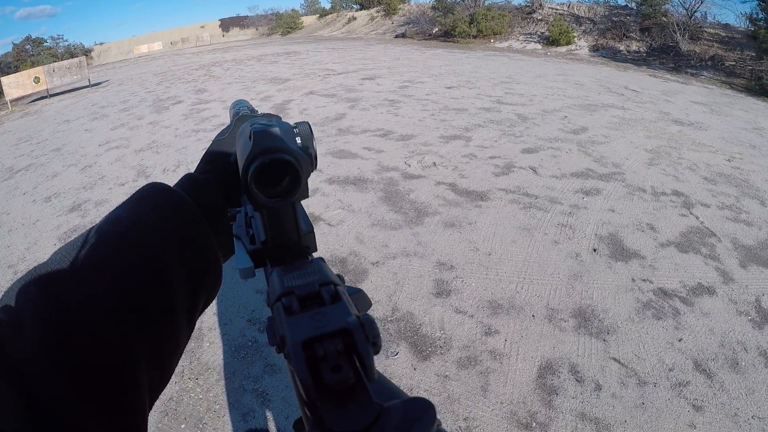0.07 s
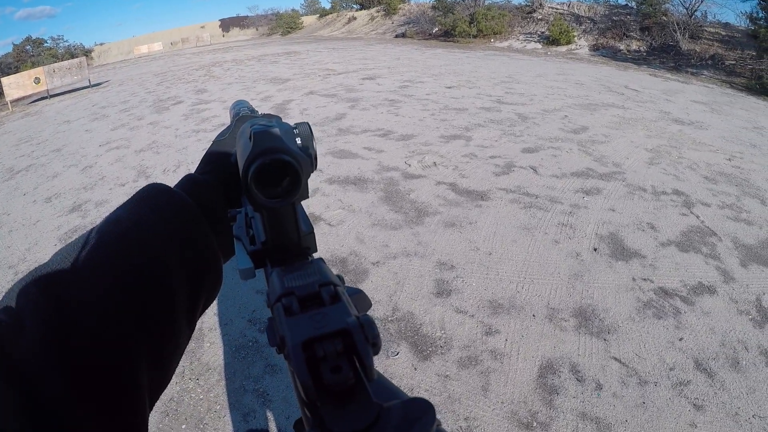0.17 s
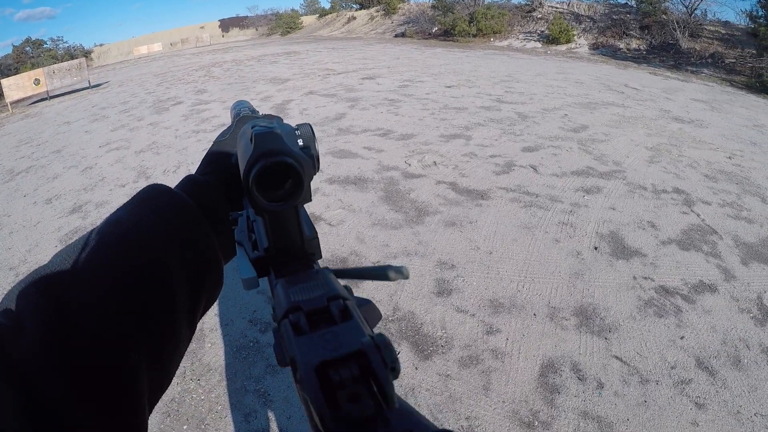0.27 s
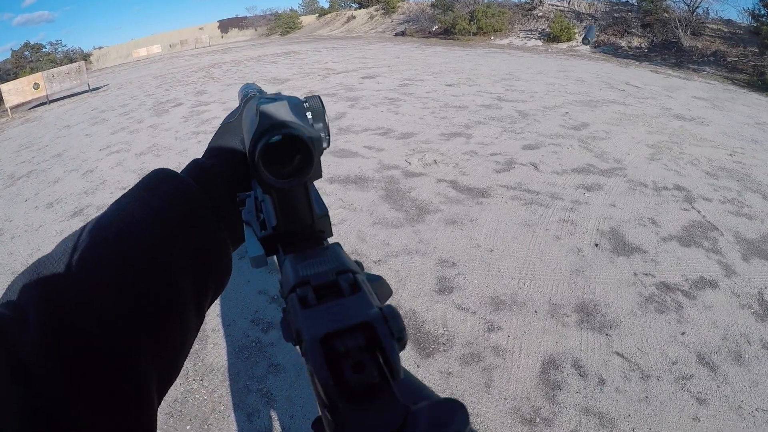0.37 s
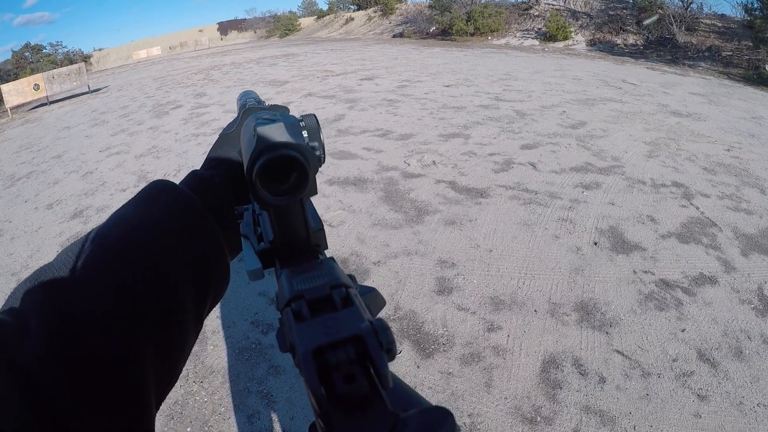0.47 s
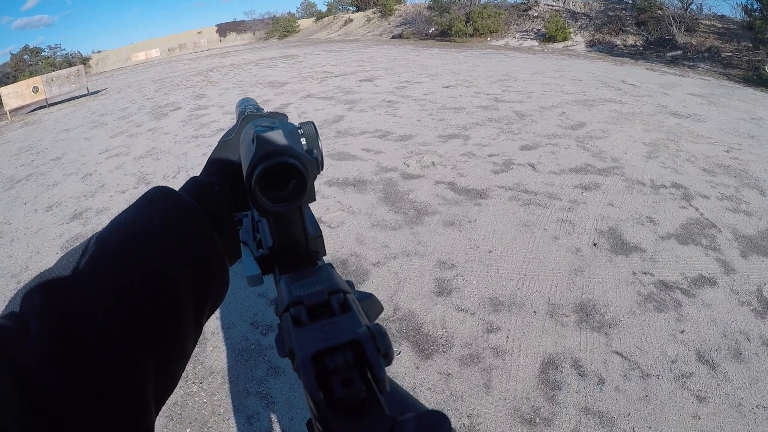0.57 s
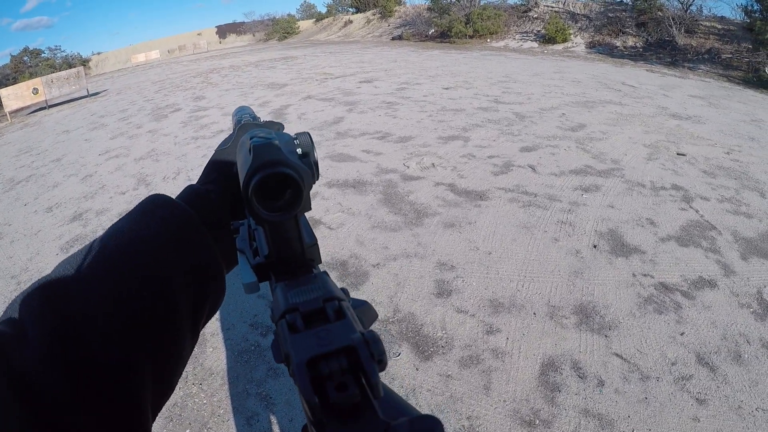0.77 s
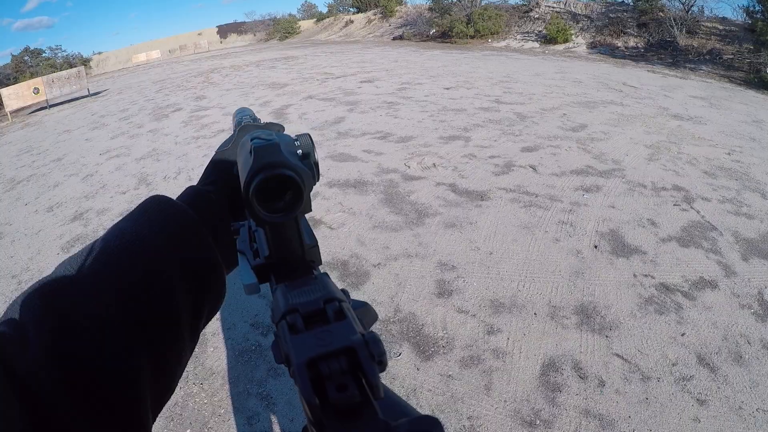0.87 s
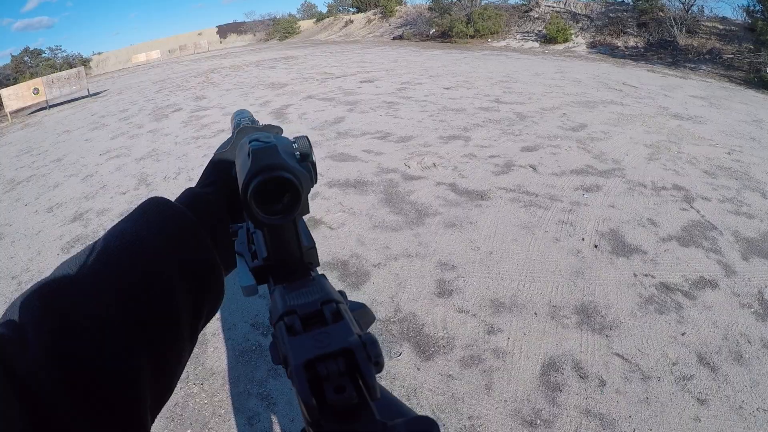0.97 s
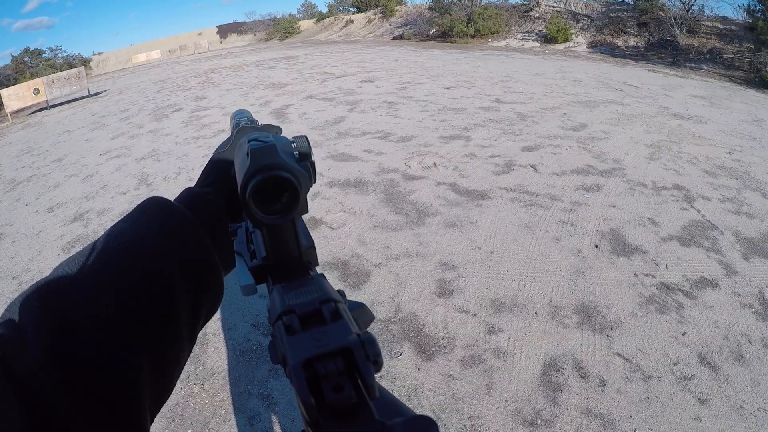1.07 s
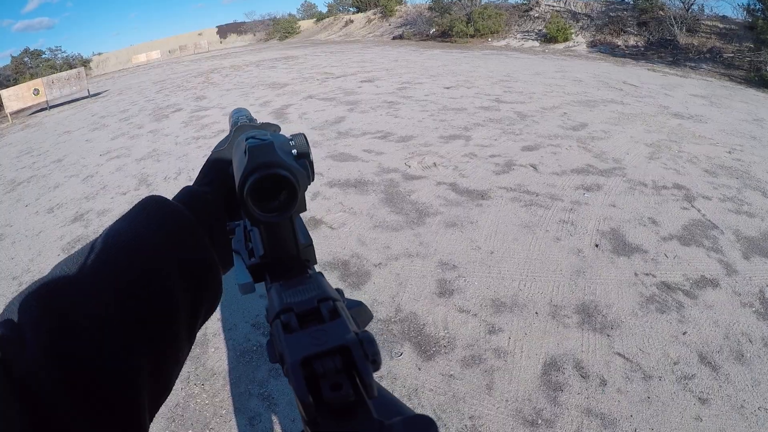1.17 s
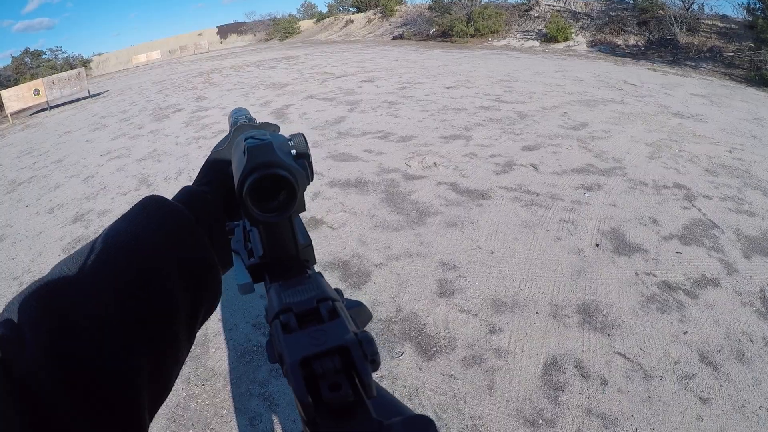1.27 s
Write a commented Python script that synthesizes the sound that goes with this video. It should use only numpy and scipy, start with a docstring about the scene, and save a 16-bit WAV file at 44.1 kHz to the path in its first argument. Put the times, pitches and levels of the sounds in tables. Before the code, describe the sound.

A suppressed rifle shot outdoors, then a bullet smacks steel and rings high and brief

```python
"""Suppressed rifle shot and ringing metal

Outdoors in wind, heard from just behind the gun: wind is noise under moving level curves, and the report
is a quick run of gas puffs over a low thump, ending in a sharp noise blast. The action clacks and the
berms answer as diffuse noise. A third of a second later come a crack and a smack, then a high metallic
ring, a sum of decaying modes with a smeared return. The next shot is just starting at the end.
"""
import sys
import numpy as np
from scipy import signal
from scipy.fft import rfft, irfft, next_fast_len
from scipy.io import wavfile
from scipy.ndimage import map_coordinates

SR = 44100
rng = np.random.default_rng(int(sys.argv[2]) if len(sys.argv) > 2 else 0)


def to_wav(sig):
    """Store sig (one row per channel, or 1-D mono) as 16-bit WAV at the path in sys.argv[1].

    Samples outside -1..1 are clipped; the rate is SR.
    """
    pcm = np.clip(np.atleast_2d(sig), -1, 1) * 32767
    pcm = np.round(pcm).astype(np.int16)
    wavfile.write(sys.argv[1], SR, pcm.T)  # frames by channels


N = 57330
T = np.arange(N) / SR  # time in s
NEAR_ALIKE, FAR_ALIKE, WIND_ALIKE = 0.74, 0.16, 0.13  # left-right correlation of the noise


def amp(db):
    """Level to amplitude ratio: 20 dB is a factor of ten."""
    return 10 ** (np.asarray(db) / 20)


def unit(x):
    """Normalisation by root mean square, so that a gain sets the level."""
    return x / np.sqrt(np.mean(x ** 2) + 1e-20)


def along(points, hz):
    """Interpolation of a spectrum on a logarithmic frequency axis."""
    f, v = np.transpose(points)
    return np.interp(np.log(hz + 1), np.log(f + 1), v)


def level(rows):
    """Amplitude modulation whose level in dB runs in straight lines between (time_s, level_db) rows."""
    return amp(np.interp(T, *np.transpose(rows)))


def pan(db):
    """Interaural level difference: half the dB raise the left channel, half lower the right."""
    return amp(np.array([[db], [-db]]) / 2)


def filtered(x, response):
    """Linear filtering: the spectrum of x is multiplied by a frequency response."""
    size = next_fast_len(N + 8192)  # zero padding limits wrap-around
    hz = np.fft.rfftfreq(size, 1 / SR)
    return irfft(rfft(x, size) * response(hz), size)[..., :N]


def noise(colour, alike, pan_db):
    """Partially correlated stereo noise: a shared part plus a part of opposite sign in the two channels."""
    white = rng.standard_normal((2, N))
    shared, opposed = filtered(white, lambda hz: amp(along(colour, hz)))
    angle = np.arccos(np.clip(alike, -1, 1)) / 2
    stereo = np.cos(angle) * shared + np.sin(angle) * np.array([opposed, -opposed])
    return unit(stereo) * pan(pan_db)


def strike(s, rise, t60):
    """Exponential growth up to time s (time constant rise), then exponential decay of 60 dB in t60."""
    swell = np.exp(np.minimum(T - s, 0) / rise)
    decay = amp(-60 * np.maximum(T - s, 0) / t60)
    return swell * decay


def packet(s, hz, db, width):
    """Gaussian wave packet: a brief pressure oscillation, negative at its centre."""
    return -amp(db) * np.exp(-((T - s) / width) ** 2) * np.cos(2 * np.pi * hz * (T - s))


def wind():
    """Turbulent pressure noise: rumble on the microphone, a midrange rush and a thin hiss."""
    # level of the rumble: time_s, level_db
    rumble_level = [(0, -34), (.1, -38.5), (.21, -34), (.32, -45.5), (.48, -49), (.54, -44.5), (.66, -42.5),
                    (.8, -44.5), (.98, -49), (1.08, -53.5), (1.15, -44), (1.29, -43)]
    # spectrum of the rumble: frequency_hz, level_db
    rumble_colour = [(15, -2), (35, -0.5), (70, 1), (120, -9.5), (200, -16.5), (400, -28.5), (1000, -37.5),
                     (3000, -77)]
    # level of the midrange rush: time_s, level_db
    rush_level = [(0, -49.5), (.22, -47), (.3, -61.5), (.9, -59), (1.1, -59.5), (1.29, -55)]
    # spectrum of the rush: frequency_hz, level_db
    rush_colour = [(100, 8), (300, 2), (800, -1.5), (1600, -7), (3000, -26), (8000, -28), (15000, -52)]
    # level of the hiss: time_s, level_db
    hiss_level = [(0, -65.5), (.22, -63.5), (.5, -67), (1, -76), (1.29, -75.5)]
    # spectrum of the hiss: frequency_hz, level_db
    hiss_colour = [(1000, -5), (3500, -14), (5200, -15), (7200, -3.5), (10000, 0), (13000, -14),
                   (15500, -20.5)]
    rumble = level(rumble_level) * noise(rumble_colour, WIND_ALIKE, pan_db=3.5)
    rush = level(rush_level) * noise(rush_colour, FAR_ALIKE, pan_db=-2.5)
    hiss = level(hiss_level) * noise(hiss_colour, FAR_ALIKE, pan_db=-3.5)
    return rumble + rush + hiss


def action():
    """Impulsive excitation of the rifle's moving parts: coloured noise bursts that decay exponentially."""
    # clacks: peak_s, level_db, t60_s
    clacks = [(0.226, -38, 0.046), (0.2329, -38, 0.036), (0.286, -40, .03), (0.316, -37.5, 0.051),
              (0.3227, -22.5, 0.015), (0.332, -41.5, 0.088), (1.052, -55, 0.035), (1.289, -49.5, .05)]
    # spectrum of a clack: frequency_hz, level_db
    clack_colour = [(100, -13), (280, -5), (700, -21.5), (1800, -9.5), (4000, 1.5), (5500, -5), (7600, 3),
                    (9500, -14), (15000, -28)]
    envelope = sum(amp(db) * strike(s, 0.00094, t60) for s, db, t60 in clacks)
    return envelope * noise(clack_colour, NEAR_ALIKE, pan_db=-0.5)


def shot():
    """Gas expansion: puffs and low thumps as wave packets, the hissing blast as turbulent noise."""
    # gas puffs of the report: centre_s, pitch_hz, level_db, half_width_s (to 1/e)
    puff_rows = [(.2365, 790, -26.5, .0014), (.247, 780, -12, .0014), (.2571, 750, -5, .0015),
                 (.2671, 790, -4.5, .0016), (1.2995, 650, -30, .0008)]
    # thumps of the shot, the smack and buffeting: centre_s, pitch_hz, level_db, half_width_s, left_minus_right_db
    thump_rows = [(0.2591, 141, -12.5, 0.0081, 8.5), (0.2712, 190, -12.5, 0.0012, 8),
                  (0.2784, 156.5, -20, .004, -0.5), (.327, 273, -39.5, 0.0041, 1.5),
                  (.411, 210, -35, 0.0061, -2), (.5713, 560, -17.5, 0.0015, 1.5),
                  (0.5745, 195, -21, .0019, 2), (0.688, 205, -24.5, 0.0017, 7.5),
                  (0.7501, 170, -38, 0.0034, 15), (1.2757, 160, -25.5, 0.0023, 14.5),
                  (1.2905, 135, -26, 0.0068, 19)]
    # gas leaving the suppressor: peak_s, level_db, rise_s (time constant), t60_s
    blasts = [(0.2468, -25.5, 0.0014, 0.11), (0.2613, -20, 0.0028, 0.022), (0.2666, -7.5, 0.0007, 0.014),
              (0.2677, -10.5, .0005, 0.014), (.276, -22, 0.0022, .035), (1.2995, -43.5, .004, 0.033)]
    # spectrum of the blast: frequency_hz, level_db
    blast_colour = [(650, -31), (1100, -3), (1900, -9.5), (2400, -2.5), (2980, -2), (3330, -5), (3840, -4),
                    (5500, -11), (6120, -3), (7800, -4), (10400, -24.5), (12000, -21), (15500, -32)]
    puffs = sum(packet(*row) for row in puff_rows)
    thumps = sum(packet(s, hz, db, width) * pan(side) for s, hz, db, width, side in thump_rows)
    gas = sum(amp(db) * strike(s, rise, t60) for s, db, rise, t60 in blasts)
    return puffs + thumps + gas * noise(blast_colour, NEAR_ALIKE, pan_db=-1.5)


def berms():
    """Diffuse reflection from ground, brush and berms: echo noise, a low boom and a late fluttering slap."""
    # level of the scattered echoes: time_s, level_db
    echo_level = [(.27, -59), (.285, -45.5), (.31, -44.5), (.36, -55.5), (.395, -45.5), (.43, -43),
                  (.48, -48.5), (.54, -42.5), (.6, -42.5), (.675, -43), (.72, -48.5), (.82, -62.5),
                  (.865, -62.5), (.91, -73), (.95, -68.5), (1.02, -70), (1.29, -76)]
    # spectrum of the echoes: frequency_hz, level_db
    echo_colour = [(100, -7.5), (300, -3), (700, -7.5), (1500, -2), (3500, 1), (5200, -5.5), (7300, 4.5),
                   (9500, -15), (15000, -33)]
    # level of the low boom: time_s, level_db
    boom_level = [(.27, -76), (.37, -61.5), (.42, -42), (.52, -63), (.65, -42), (.71, -45), (.76, -39.5),
                  (.8, -47), (.87, -54), (1, -60)]
    # spectrum of the boom: frequency_hz, level_db
    boom_colour = [(40, -9.5), (90, 6), (200, 1.5), (300, -9), (450, -24), (1000, -43)]
    # spectrum of the dull slap from the far berm: frequency_hz, level_db
    slap_colour = [(300, -12), (800, 1), (1800, 2), (3000, -17), (8000, -27.5)]
    slap_s, slap_db, slap_rise_s, slap_t60 = 0.8955, -54.5, 0.033, 0.185
    flutter_db, flutter_per_s = 3, 90  # spread and rate of the random level values
    steps = rng.standard_normal(int(T[-1] * flutter_per_s) + 2)
    flutter = amp(flutter_db * map_coordinates(steps, [T * flutter_per_s]))
    slap_envelope = amp(slap_db) * flutter * strike(slap_s, slap_rise_s, slap_t60)
    slap = slap_envelope * noise(slap_colour, FAR_ALIKE, pan_db=-9.0)
    echoes = level(echo_level) * noise(echo_colour, FAR_ALIKE, pan_db=-.5)
    boom = level(boom_level) * noise(boom_colour, WIND_ALIKE, pan_db=7.5)
    return slap + echoes + boom


def crack_and_smack():
    """Impulsive broadband noise: faint dull knocks, a bright crack and a dull smack, each decaying fast."""
    # knocks: peak_s, level_db, t60_s
    knock_rows = [(0.408, -44.5, 0.055), (0.686, -29, 0.026)]
    # spectrum of the knocks: frequency_hz, level_db
    knock_colour = [(60, -7), (250, 3), (500, 0), (900, -16.5), (1300, -9.5), (3500, -19.5), (7000, -28.5),
                    (15000, -60)]
    # spectrum of the crack: frequency_hz, level_db
    crack_colour = [(290, -35.5), (500, -14), (1050, -11), (2000, 6), (3050, -9), (3940, 7.5), (5400, -5.5),
                    (6670, 9.5), (9000, -11.5), (15000, -36)]
    # spectrum of the smack: frequency_hz, level_db
    smack_colour = [(40, 1), (150, -5), (300, -6), (600, -6.5), (1000, -18), (2200, 4), (3500, -13.5),
                    (6000, -17.5), (15000, -49.5)]
    crack_s, crack_db, crack_t60 = .5594, -13.5, 0.0068  # the snap just before the smack
    smack_s, smack_db, smack_t60 = .5705, -13.5, 0.012
    crack_envelope = amp(crack_db) * strike(crack_s, 0.00033, crack_t60)
    crack = crack_envelope * noise(crack_colour, NEAR_ALIKE, pan_db=-4.5)
    smack_envelope = amp(smack_db) * strike(smack_s, 0.00037, smack_t60)
    smack = smack_envelope * noise(smack_colour, NEAR_ALIKE, pan_db=4.5)
    knocks = sum(amp(db) * strike(s, 0.00037, t60) for s, db, t60 in knock_rows)
    return crack + smack + knocks * noise(knock_colour, NEAR_ALIKE, pan_db=6.5)


def metal_ring(count=60):
    """Modal superposition: strong modes, a shimmer of count weak ones, and a splash of decaying noise."""
    # strong modes of the metal: pitch_hz, relative_level_db, t60_s
    strong_modes = [(1772, -18, .32), (2050, -17, .32), (3494, -19, .7), (4423, -24, .7), (5224, -17, .5),
                    (5350, -21, .55), (5760, -22, .35), (6155, -18, .45), (6551, -13, .35),
                    (6681, -22, .35), (6821, -11, .46), (7127, 1.5, .36), (7418, -2.5, .27),
                    (7499, -12, .25), (7650, -11, .36), (7800, -11, .32), (7924, -6.5, .33),
                    (8280, -17, .33), (8689, -22, .46), (8861, -20, .35), (9641, -19, .42),
                    (10018, -26, .52), (10311, -21, .3), (10600, -31, .6), (11300, -17, .55),
                    (12005, -23, .38), (12473, -23, .4), (12699, -23, .45), (13420, -28, .35),
                    (13700, -28, .35)]
    # relative strength of the weak modes: frequency_hz, level_db
    shimmer_colour = [(3000, 3), (5000, -6), (6500, 3.5), (8500, 3), (10500, -23), (12500, 1.5),
                      (14500, -12.5)]
    # spectrum of the splash: frequency_hz, level_db
    splash_colour = [(150, -20), (500, -7.5), (1000, -7.5), (1900, -1.5), (3000, -8), (5000, -5),
                     (7400, -5), (9000, -34), (15000, -51.5)]
    ring_s, ring_attack_s = .5712, 0.00028  # start, and time constant of the onset
    ring_db, ring_pan_db = -24, -5
    shimmer_db, shimmer_t60 = -39.5, 0.45
    splash_db, splash_t60 = -33, 0.34
    waver_db, waver_per_s = 2.6, 32  # spread and rate of each mode's random level values
    flare_db, flare_s = 5, .011  # louder just after the onset, then settling
    t = np.maximum(T - ring_s, 0)

    def mode(hz, t60, scatter):
        """Damped oscillation of unsteady level; scatter (radians) puts the two channels out of step."""
        phase = rng.uniform(0, 2 * np.pi) + scatter * rng.standard_normal((2, 1))
        waver = map_coordinates(rng.standard_normal(count), [t * waver_per_s])
        return np.sin(2 * np.pi * hz * t + phase) * amp(waver_db * waver - 60 * t / t60)

    flare = amp(flare_db * np.exp(-t / flare_s))
    modes = sum(amp(ring_db + db) * mode(hz, t60, scatter=0.29) for hz, db, t60 in strong_modes)
    ring = flare * modes * pan(ring_pan_db)

    # one weak mode at a random place in each equal slice of the band
    pitches = 3000 + 11500 * (np.arange(count) + rng.random(count)) / count
    sizes = amp(along(shimmer_colour, pitches) + rng.normal(0, 4.1, count))
    gains = sizes / np.linalg.norm(sizes)
    weak = sum(gain * mode(hz, shimmer_t60, scatter=1.1) for hz, gain in zip(pitches, gains))
    shimmer = amp(shimmer_db) * weak * pan(db=13.5)

    splash = amp(splash_db - 60 * t / splash_t60) * noise(splash_colour, FAR_ALIKE, pan_db=4.0)
    onset = 1 - np.exp(-t / ring_attack_s)  # zero until the ring starts
    return (ring + shimmer + splash) * onset


def echoed(x, smear_s):
    """Diffuse reflection: x plus its convolution with a delayed noise burst, a faint, smeared return."""
    # spectrum of the returning sound: frequency_hz, level_db
    return_colour = [(3000, 0.5), (5300, 1.5), (7000, -6.5), (12000, -5.5)]
    delay_s, return_db = 0.3262, -30.5
    window = np.exp(-((T - delay_s) / smear_s) ** 2)
    tail = noise(return_colour, FAR_ALIKE, pan_db=-2) * window
    tail = tail / np.linalg.norm(tail[0])
    return x + amp(return_db) * signal.fftconvolve(x, tail, axes=1)[:, :N]


def scene():
    """Superposition: direct sounds get an interchannel phase lead; echoes and wind arrive diffusely."""
    # phase lead of the left port over the right for direct sounds: frequency_hz, lead_rad
    port_lead = [(100, 0.074), (800, 0.32), (2000, 0.85), (4000, 1.05), (8000, 1.8), (14000, 2.8)]
    sides = np.array([[1], [-1]])
    direct = action() + shot() + crack_and_smack() + echoed(metal_ring(), smear_s=0.022)
    direct = filtered(direct, lambda hz: np.exp(.5j * along(port_lead, hz) * sides))
    return wind() + direct + berms()


def record(dry):
    """Saturation and band limiting: peaks clip at full scale, then a sharp low-pass removes the top."""
    top_hz = 15700
    return filtered(np.clip(dry, -1, 1), lambda hz: hz < top_hz)


dry = scene()
out = record(dry)
to_wav(out)
```